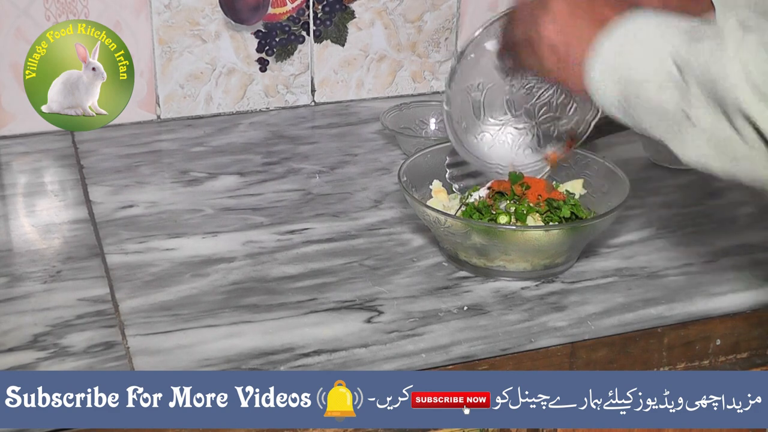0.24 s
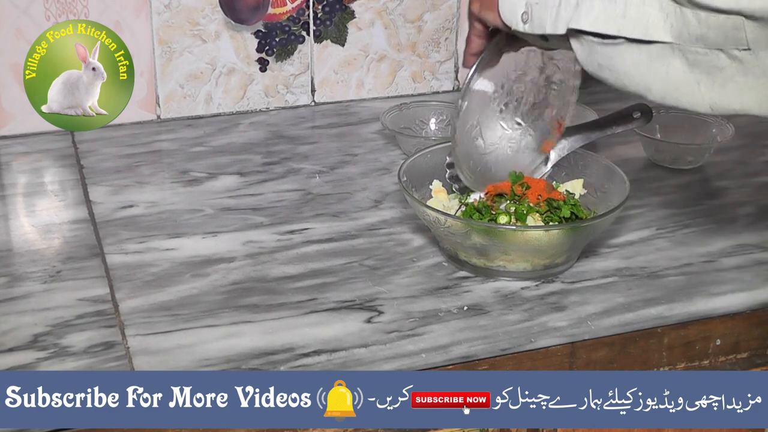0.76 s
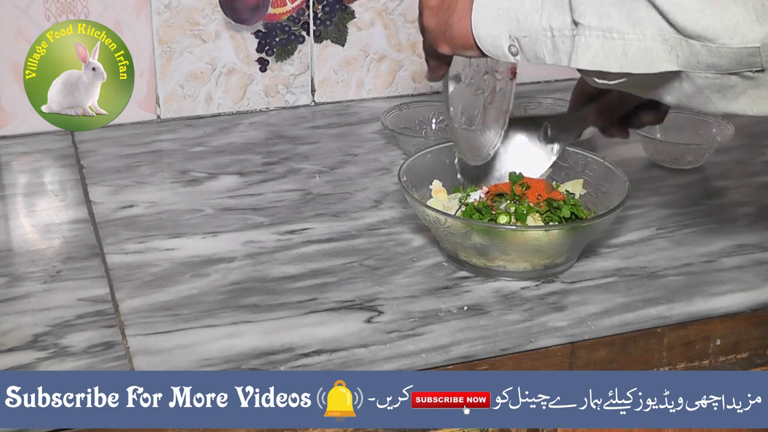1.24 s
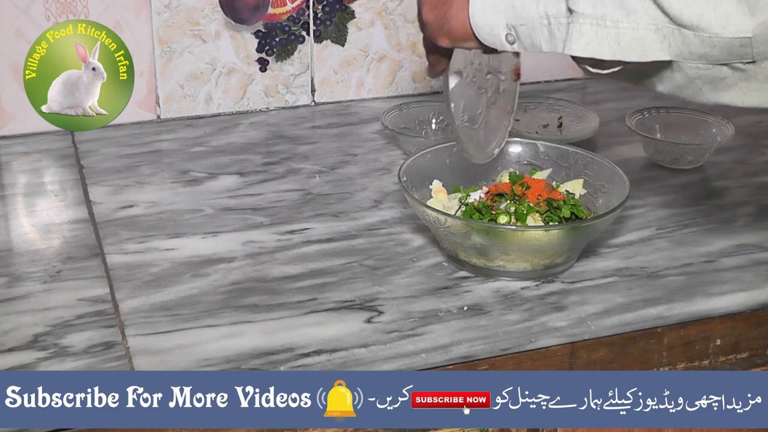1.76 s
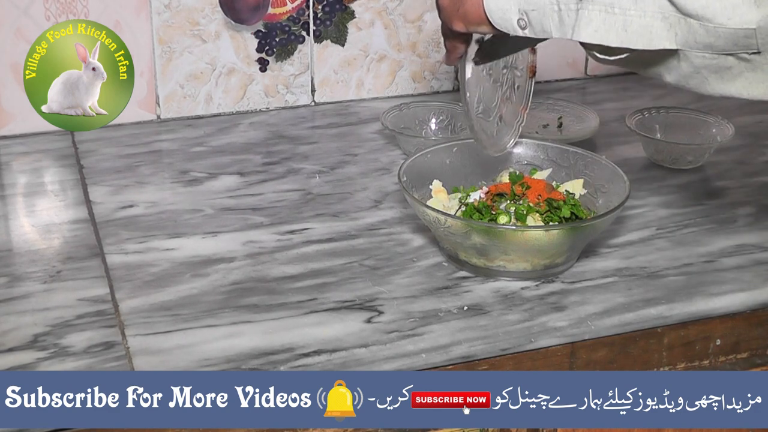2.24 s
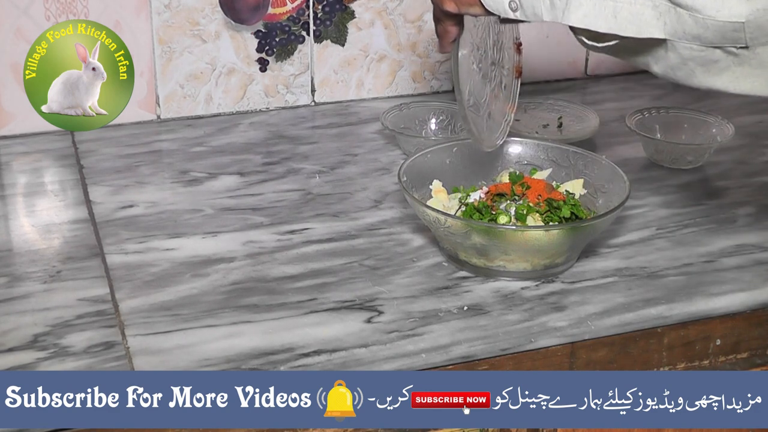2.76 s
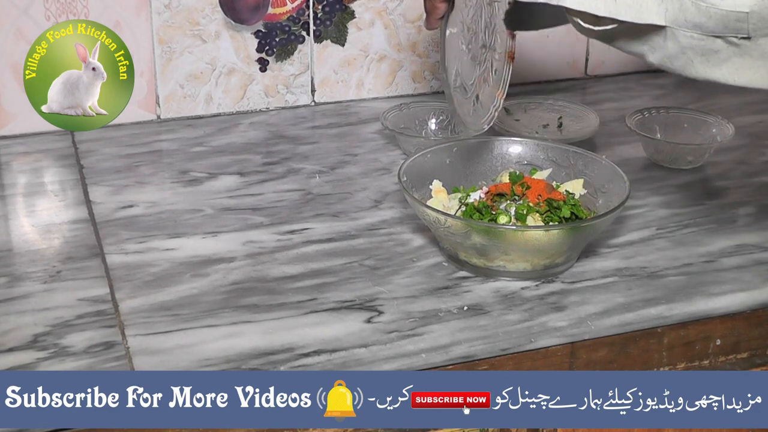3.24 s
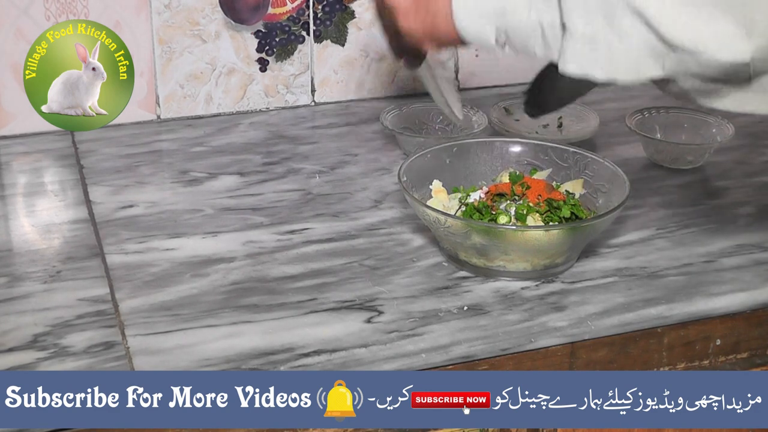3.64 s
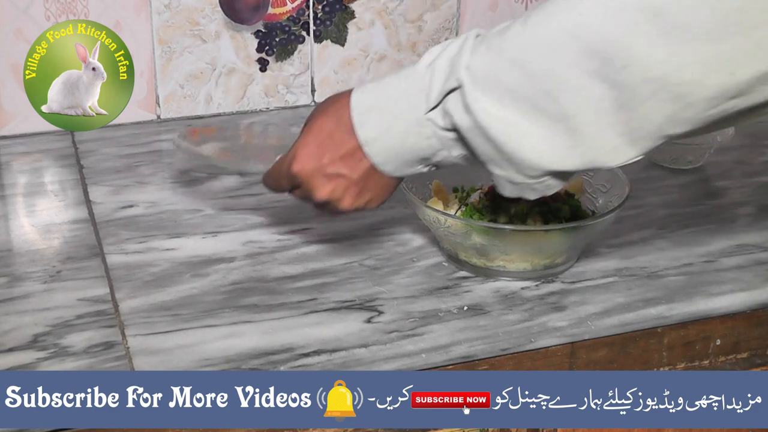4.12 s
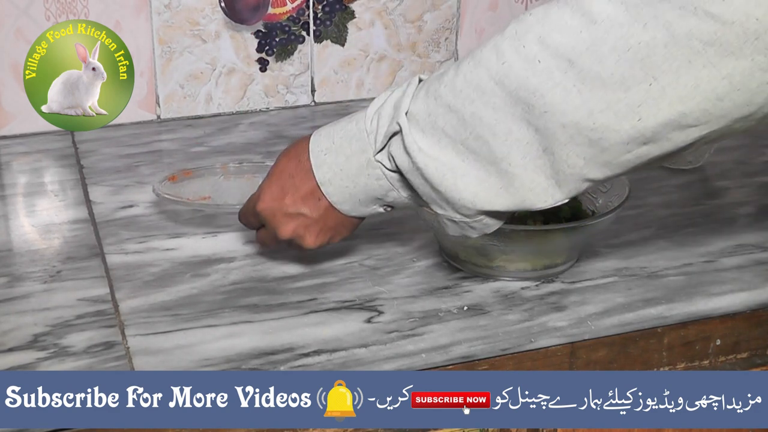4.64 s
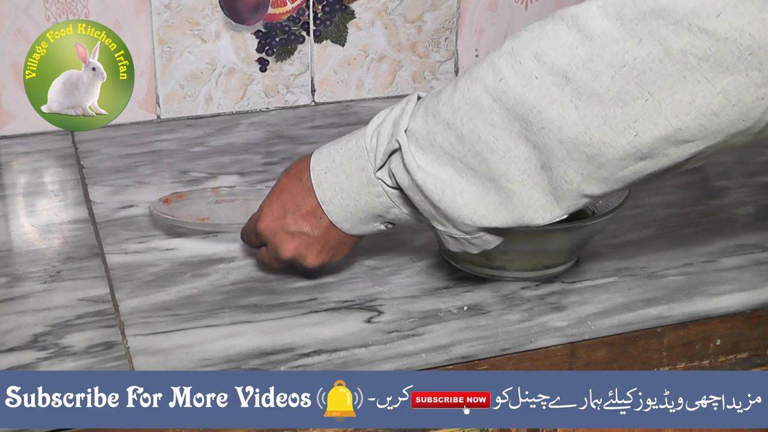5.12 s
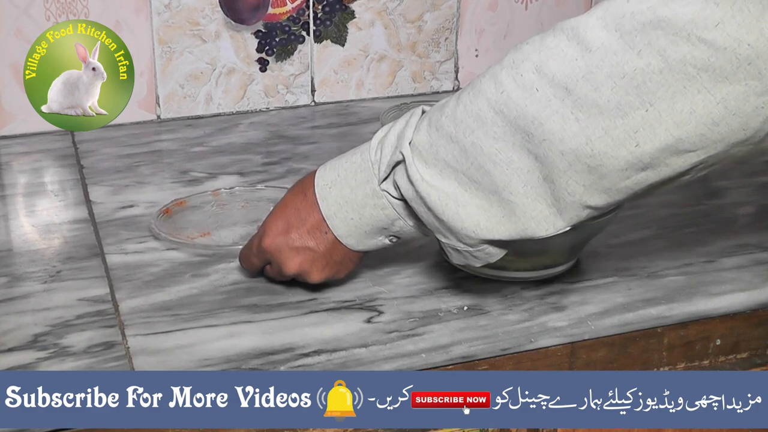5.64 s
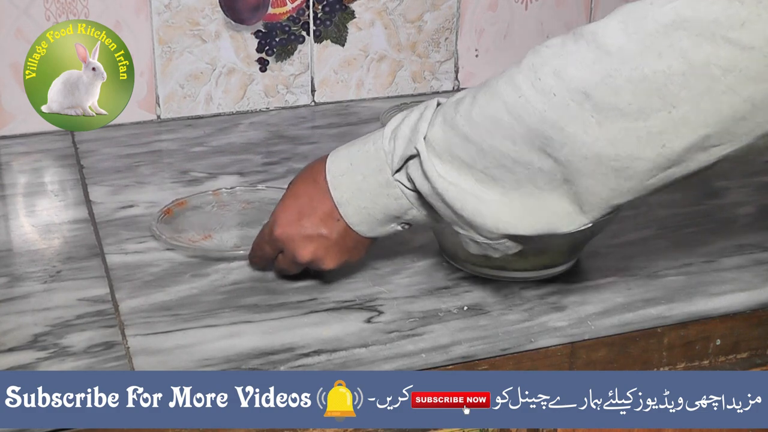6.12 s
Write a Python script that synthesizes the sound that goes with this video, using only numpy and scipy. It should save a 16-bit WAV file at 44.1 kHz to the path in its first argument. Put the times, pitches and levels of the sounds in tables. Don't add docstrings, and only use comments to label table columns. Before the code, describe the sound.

A quiet tiled kitchen with low, steady hum and faint sleeve rustle, heard close up with a short bright room echo. At about 1.2 s a steel blade lightly clinks a glass bowl's rim, then its side at 1.4 s with a quick flutter of touches. A low puff of air bumps the microphone around 1.6 s. Loud, sharp taps on a hand-held glass plate follow at 1.9 and 2.3 s, ringing briefly, then softer ones at 2.4 s with a chirping slide near 2.5 s. Another tap comes at 2.8 s, a bumpy, gritty scrape with a tiny squeak at 3.0-3.1 s, a soft nudge at 3.3 s and a last tap at 3.5 s. Cloth creaks quietly. At 5.24 s the plate clacks down on stone, bounces at 5.29 s and rattles, then rocks with short groans, ticks and drags, ending in a firmer scrape near 6.35 s.

```python
import sys
import numpy as np
from scipy import signal
from scipy.io import wavfile
from scipy.ndimage import uniform_filter1d

SR = 44100
rng = np.random.default_rng(int(sys.argv[2]) if len(sys.argv) > 2 else 0)


def wav_out(sig):
    wavfile.write(sys.argv[1], SR, np.round(np.clip(np.atleast_2d(sig).T, -1, 1) * 32767).astype(np.int16))


def gain_from_db(level_db):
    decades = np.asarray(level_db, float) / 20
    return 10 ** decades


N = 281358


def rms_one(x):
    return x / np.sqrt(np.mean(x ** 2) + 1e-20)


def at_hz(points, hz):
    point_hz, value = np.transpose(points)
    return np.interp(np.log(hz), np.log(point_hz), value)


def butter(x, order, hz, kind="low"):
    return signal.sosfilt(signal.butter(order, hz, kind, fs=SR, output="sos"), x)


def drift(rate_hz):
    r = np.exp(-80 * np.pi * rate_hz / SR)
    slow = signal.lfilter([1], [1, -2 * r, r * r], rng.standard_normal(N // 40 + 2002))[2000:]
    return np.interp(np.arange(N) / 40, np.arange(len(slow)), rms_one(slow))


def ring(clicks, hz, t60):
    r, w = gain_from_db(-60 / (t60 * SR)), 2 * np.pi * hz / SR
    return signal.lfilter([0, np.sin(w)], [1, -2 * r * np.cos(w), r * r], clicks + 1e-18)


def spin(hz, size):
    step = np.exp(2j * np.pi * hz / SR)
    return np.cumprod(np.repeat(step, size, axis=-1), axis=-1) / step


EDGES_HZ = 20 * 2 ** np.arange(0, 9.9, .4)


def bands(size):
    white = rng.standard_normal((2, size))
    for k, (low, high) in enumerate(zip(EDGES_HZ, EDGES_HZ[1:])):
        yield np.sqrt(low * high), butter(white[k % 2], 2, [low, high], "band")


def coloured(spectrum, patchy_db, size=N):
    shared = drift(8.0)[:size]
    total = np.zeros(size)
    for hz, x in bands(size):
        flicker_db = patchy_db * (shared + drift(15)[:size])
        total += x * gain_from_db(at_hz(spectrum, hz) + flicker_db)
    return rms_one(total)


def swells(rows, rise_db_s, fall_db_s):
    t = np.arange(N) / SR
    level_db = [db - rise_db_s * (s - t).clip(0) - fall_db_s * (t - s - length).clip(0)
                for s, length, db in rows]
    return gain_from_db(np.max(level_db, axis=0))


# frequency in Hz, level in dB per Hz.
CRACK = [(88, -51.5), (150, -9.5), (1170, -16.5), (1800, -3), (2570, -15), (3190, -5), (5760, -11.5),
         (6350, -29), (8050, -11.5), (9430, -23.5), (12400, -5), (15100, -23.5), (16700, -32)]
BURST = coloured(CRACK, patchy_db=0, size=SR)
SPREAD_DB, SPREAD_RAD = 1.0, .4
EDGE_CUT_HZ, FLAT_CUT_HZ = 11700, 7372
GLASS_CUT_HZ, STONE_CUT_HZ, FINGER_CUT_HZ = 20000, 2782, 1600


def struck(taps, modes, cut_hz, damping, crack_s=.006, split=.012):
    pair_share, pair_beat_hz = 0.48, 17
    linger_share, linger_slowing = 0.068, 0.19
    twin_share = 0.48
    out, span = np.zeros(N + SR), np.arange(SR // 4) / SR
    hz, level_db, t60 = np.transpose(modes)
    dying = gain_from_db(-60 * span / (damping * t60[:, None]))
    beat = spin(pair_beat_hz * np.sqrt(hz[:, None] / 1800), len(span))
    lingering = linger_share * (1 - pair_share + pair_share * beat) * dying ** linger_slowing
    rings = spin(hz[:, None], len(span)) * (dying + lingering)
    offset = split * rng.uniform(.3, 1, (3, len(hz), 1)) * [[[1]], [[-1]], [[2]]]
    near_hz = hz[:, None] * (1 + offset)
    phase = np.exp(2j * np.pi * rng.random(near_hz.shape))
    twins = (spin(near_hz, len(span)) * phase).sum(0) * dying
    soft = 1 / np.sqrt(1 + (hz / cut_hz) ** 2)
    crack_filter = signal.butter(2, min(cut_hz, 20000), fs=SR)
    crack_shape = np.exp(-span / crack_s) + 0.22 * np.exp(-span / 0.000049)
    for s, db, crack_db in taps:
        chance = rng.standard_normal((3, len(modes)))
        size = soft * gain_from_db(level_db + SPREAD_DB * chance[0]) / np.sqrt(np.sum(gain_from_db(level_db) ** 2))
        main = (size * np.exp(1j * SPREAD_RAD * chance[1])) @ rings
        crowd = twin_share * (size * np.exp(1j * chance[2])) @ twins
        body = 0.46 * (main + crowd).imag * np.minimum(span / 0.0013, 1)
        start = rng.integers(SR // 2)
        noise = signal.lfilter(*crack_filter, BURST[start:start + len(span)])
        crack = 0.39 * gain_from_db(crack_db) * noise * crack_shape
        out[round((s + .0006) * SR):][:len(span)] += gain_from_db(db) * (body + crack)
    return out[:N]


def friction(modes, per_s, t60, spread_db):
    when = rng.random(N) < per_s / SR
    size = gain_from_db(spread_db * np.minimum(rng.exponential(1, N), 4))
    slips = when * size * rng.choice([-1, 1], N)
    t = np.arange(SR // 5) / SR
    response = sum(gain_from_db(db - 60 * t / t60) * np.sin(2 * np.pi * hz * t) for hz, db, _ in modes)
    return rms_one(signal.oaconvolve(slips, response)[:N]), rms_one(slips)


# frequencies in Hz, then ring times (t60) in seconds.
PLATE_HZ = [335, 580, 995, 1150, 1270, 1545, 1640, 1817, 1876, 2330, 2850, 3175, 3700, 3880, 4055, 4525,
            4720, 4870, 5120, 5245, 5470, 5595, 5850, 6460, 7000, 7868, 8270, 10100, 10430, 12050]
PLATE_T60 = [.14, .1, .1, .08, .12, .09, .08, .42, .26, .1, .1, .36, .1, .12, .1, .1, .1, .1, .13, .17, .12,
             .13, .18, .07, .08, .07, .06, .1, .08, .09]


def plate(spot_db):
    return list(zip(PLATE_HZ, spot_db, PLATE_T60))


# frequency in Hz, level in dB per Hz.
HUM = [(13, -31), (22, -5), (93, 1.5), (175, -15), (230, 0.5), (387, -7), (431, -3), (668, -10.5),
       (877, -7.5), (1150, -13), (1640, -13), (3080, -23), (4270, -23.5), (12700, -36), (15000, -54.5)]
# frequency in Hz, rms level in dB.
HUM_LINES = [(43.1, -75), (112, -75), (436.0, -76), (877.5, -77)]


def room_hum():
    t = np.arange(N) / SR
    out = gain_from_db(-62) * coloured(HUM, patchy_db=.3)
    for hz, db in HUM_LINES:
        out += np.sqrt(2) * gain_from_db(db + 3.3 * drift(1.1)) * np.sin(2 * np.pi * hz * t)
    return out


# frequency in Hz, level in dB per Hz.
CLOTH = [(710, -35), (1200, 0), (1700, -1.5), (2260, 0), (2620, -3), (3450, 2), (5100, 2), (8660, -18),
         (12900, -7), (15000, -42.5)]
# frequency in Hz, level in dB, t60 in seconds.
WEAVE = [(4440, -6, 0.0034), (7150, -15, 0.0023), (3616, -11, 0.0022)]
# start in seconds, length in seconds, level in dB.
RUSTLE = [
    (.45, 0.33, -65.5),
    (2.04, .01, -49),
    (2.47, 0.0068, -31),
    (2.98, 0.046, -44.5),
    (3.5, 0.16, -42.5),
    (4.95, 0.46, -59.5),
    (5.4, 0.069, -51),
    (5.9, 0.73, -54),
]
# start in seconds, length in seconds, level in dB.
SLEEVE = [
    (4.37, 0.011, -70),
    (4.45, 0.0096, -74),
    (4.77, 0.043, -65.5),
    (5.17, 0.26, -64.5),
    (5.72, 0.03264, -63.5),
]


def sleeves():
    cloth = coloured(CLOTH, patchy_db=.9)
    for hz, db, t60 in WEAVE:
        fold = rms_one(ring(rng.standard_normal(N), hz, t60))
        cloth = cloth + gain_from_db(db + 2.1 * drift(2.7)) * fold
    bright = rms_one(np.diff(cloth[::-1], prepend=0))
    rubbing = gain_from_db(-63.5) + swells(RUSTLE, rise_db_s=149.5, fall_db_s=161)
    return rubbing * gain_from_db(-14) * cloth + swells(SLEEVE, rise_db_s=288, fall_db_s=78.5) * bright


# start in seconds, length in seconds, level in dB.
PUFF = [
    (1.565, 0.04, -28.5),
    (1.75, 0.02083, -41.5),
    (1.86, 0.064, -36.5),
    (2.07, 0.0145, -47.5),
]


def air_puff():
    low = butter(rng.standard_normal(N), 3, [24, 95], "band")
    return swells(PUFF, rise_db_s=490, fall_db_s=248) * gain_from_db(-9.5) * rms_one(low)


# time in seconds, level in dB.
THUDS = [
    (5.239, -51.5),
    (5.293, -60),
    (5.602, -61),
    (5.72, -83),
    (6.03, -66),
]


def counter_thud():
    clicks = np.zeros(N)
    for s, db in THUDS:
        clicks[round(s * SR)] = gain_from_db(db)
    return ring(clicks, hz=84, t60=0.13) + ring(clicks, hz=118.57, t60=0.941)


# frequency in Hz, level in dB, t60 in seconds.
BOWL_RIM = [(332, -13, 0.14), (902.01, -8, 0.085), (1065, -2.5, 0.044), (1822, -6, 0.064),
            (2090, -4.5, 0.14), (2870, -0.5, 0.1), (3010, -11, 0.042), (3812, -7, 0.049),
            (3920.7, -5.5, 0.085), (4720, 4.5, 0.032), (4830, 0, 0.038), (4830, -7.5, 0.11),
            (5782.2, -4, 0.036), (5850, -7, 0.025), (6100, -0.5, 0.0275), (6800, -20, 0.04),
            (6900, -7, 0.03), (7450, -7, 0.02767), (9240, -17, 0.0679), (11264, -31, .05)]
# time in seconds, peak in dB, crack in dB re ring.
RIM_TAPS = [
    (1.2160, -42, -14),
    (1.2295, -21.5, -4.5),
    (1.2345, -22, -10),
]
# frequency in Hz, level in dB, t60 in seconds.
BOWL_SIDE = [(332, -8, 0.14), (689, -3.5, 0.05), (1024.1, -4.5, 0.11), (1286, -7, 0.12), (1578, -9, 0.064),
             (1942, -2.5, 0.091), (2540, -6, 0.049), (2950, -9, 0.098), (3590, -16.5, 0.13),
             (5332.3, -11.5, 0.091), (4967, -10, 0.075), (5274, -10, 0.095), (5910, -13, 0.12),
             (6504.4, -11.5, 0.06), (7190, -11.5, 0.045), (7835.3, -15, .05), (8690, -12, 0.047),
             (10000, -15, 0.04)]
# time in seconds, peak in dB, crack in dB re ring.
SIDE_TAPS = [
    (1.395, -24, -5.5),
    (1.4, -21, -8.5),
    (1.406, -20, -8.5),
    (1.417, -26, -10),
    (1.429, -34, -17),
]


def bowl_taps():
    return (struck(RIM_TAPS, BOWL_RIM, EDGE_CUT_HZ, damping=0.76)
            + struck(SIDE_TAPS, BOWL_SIDE, FLAT_CUT_HZ, damping=0.49))


AT_FOOT = [-7, -14, -2.5, -1, 3, -2, 1.5, -3.5, -12, -5.5, -46.5, -11, -9.5, -8.5, -7.5, -16, -39, -42,
           -34.5, -4, -20, -7.5, -49, -54, -56, -19.5, -56, -67, -56, -64]
# time in seconds, peak in dB, crack in dB re ring.
LANDING = [
    (5.2395, -5, -6),
    (5.2913, -16, 3),
]


def plate_landing():
    chatter = [(s + k * 0.011, -22, -15) for s, _, _ in LANDING for k in (1, 2, 3)]
    return struck(LANDING + chatter, plate(AT_FOOT), STONE_CUT_HZ, damping=0.45, crack_s=0.0028)


# frequency in Hz, level in dB, t60 in seconds.
RIM_RATTLE = [(8622, 1, 0.05), (7232, 0, 0.064), (5800, -2, 0.0406), (10350, 1, 0.03877)]
# time in seconds, peak in dB.
RATTLE = [
    (5.337, -46),
    (5.3464, -49),
    (5.414, -42.5),
    (5.403, -52),
    (5.4698, -54),
    (6.309, -48),
]


def rim_rattle():
    taps = [(s, db, -0.5) for s, db in RATTLE]
    return struck(taps, RIM_RATTLE, GLASS_CUT_HZ, damping=0.5415, crack_s=0.0043)


# frequency in Hz, level in dB, t60 in seconds.
PLATE_ROCKING = [(348, -14.5, 0.16), (616, -13.5, 0.22), (653.08, -13, 0.15), (1020, -15.5, 0.11),
                 (1266, 0, 0.29), (1272, -8, 0.34), (1323, -3.5, 0.12), (1791.2, -14.5, 0.29),
                 (2350, -19, 0.28), (3186, -20, .3), (3920, -25, .3), (5310, -33, 0.35), (5620, -39, .3)]
# time in seconds, peak in dB, length in seconds.
ROCKING = [(5.559, -43, 0.021), (5.568, -25.5, 0.015), (5.596, -21.5, .015), (5.622, -27, 0.0087),
           (5.628, -24.5, 0.013), (5.643, -39.5, .02), (5.684, -44, .018), (5.7087, -26, .02),
           (5.73, -24, .013), (5.802, -35, 0.010826), (5.818, -40, 0.019), (5.869, -37, .016),
           (5.924, -34, .013), (5.956, -39, 0.013), (6.031, -39.5, 0.014), (5.972, -41.5, 0.018),
           (6.233, -37.5, 0.012), (5.998, -40.5, 0.013), (5.782, -41, 0.018), (6.326, -25.5, 0.012),
           (6.341, -26.5, .013), (6.359, -23.5, .013)]


def rocking():
    out = np.zeros(N + SR)
    hz, level_db, _ = (column[:, None] for column in np.transpose(PLATE_ROCKING))
    for s, db, length in ROCKING:
        chance, start = rng.standard_normal((2, len(hz), 1)), rng.integers(SR // 2)
        span = np.arange(int(length * SR)) / SR
        phase = 2 * np.pi * hz * (span - length / 2) + SPREAD_RAD * chance[1]
        tones = (gain_from_db(level_db + SPREAD_DB * chance[0]) * np.sin(phase)).sum(0)
        swell = np.sin(np.pi * (span / length) ** 0.87) ** 2
        grit = signal.lfilter(*signal.butter(2, 4500, fs=SR), BURST[start:start + len(span)])
        click = gain_from_db(-21) * grit * np.exp(-span / 0.0019)
        out[round((s - .002) * SR):][:len(span)] += gain_from_db(db) * (0.3 * tones * swell + click)
    return out[:N]


# frequency in Hz, level in dB, t60 in seconds.
FOOT = [(607.9, -1, 0.2), (993.18, -8.5, 0.4), (1290, 0, 0.0021), (1810, -2, 0.07), (2344.5, -10, .08),
        (5290, -18, .1)]
# time in seconds, peak in dB, crack in dB re ring.
FOOT_TICKS = [(5.545, -43, -25), (5.733, -36, -18.5), (5.752, -43, -20), (5.803, -34.5, -13.5),
              (5.87, -42, -12), (5.925, -40, -15), (6.031, -46, -12), (6.139, -49, -6), (6.236, -44.5, -3),
              (6.268, -48, -14.5), (6.31, -42, -15), (6.372, -28, -10)]


def foot_ticks():
    return struck(FOOT_TICKS, FOOT, FLAT_CUT_HZ, damping=0.9, crack_s=0.003)


# start in seconds, length in seconds, level in dB.
DRAG = [
    (5.64, 0.021, -45),
    (5.74, 0.094, -48),
    (5.9, 0.09, -48.5),
    (6.32, 0.0771, -42.5),
]


def plate_drag():
    rings, _ = friction(PLATE_ROCKING, per_s=550, t60=0.081, spread_db=2.5)
    late = np.clip((np.arange(N) / SR - 6.2) / 0.18, 0, 1)
    upper_modes = [(3252, 4.5, 0), (3870, 4.5, 0), (5270, 2.5, 0),
                   (5610, 2.0, 0), (2335, 5.0, 0), (7960, -12, 0)]
    upper, _ = friction(upper_modes, per_s=450, t60=0.0681, spread_db=0.0)
    return swells(DRAG, rise_db_s=142, fall_db_s=166.5) * gain_from_db(-2.0) * (rings + 0.64 * late * upper)


# frequency in Hz, level in dB, t60 in seconds.
PLATE_NUDGED = [(249, 1, 0.07), (329, 1.5, 0.21), (535.2, 21.5, 0.018), (697, -9, 0.11),
                (1799.8, 1, 0.1857)]
# time in seconds, peak in dB, crack in dB re ring.
NUDGE = [
    (3.312, -23, -14),
]


def finger_nudge():
    return struck(NUDGE, PLATE_NUDGED, FINGER_CUT_HZ, damping=0.58)


# frequency in Hz, level in dB, t60 in seconds.
FREE_RIM = [(3130, -3, 0.3176), (5217, -4, 0.1506), (5700, -5, .1)]
# time in seconds, peak in dB, crack in dB re ring.
SLIP_OFF = [
    (3.53, -40, -25),
    (3.547, -38.5, -25),
]


def blade_slip_off():
    return struck(SLIP_OFF, FREE_RIM, EDGE_CUT_HZ, damping=0.9146)


# frequency in Hz, level in dB, t60 in seconds.
KNOCK = [(1227.2, -8, 0.03), (1563.5, -8, 0.04), (1708, -2, 0.06), (1793, 0, 0.0654), (1953, -2, 0.064),
         (2030, -8, 0.01)]
# time in seconds, peak in dB, crack in dB re ring.
KNOCK_TAPS = [(1.8785, -15, -12), (2.2995, -9, -2.5), (2.444, -19.5, -15.5), (3.019, -28, -15),
              (3.042, -26, -20), (3.052, -26, -15), (3.061, -28.5, -15), (3.067, -20, -15),
              (3.081, -23.5, -12.5), (3.091, -28, -12), (3.499, -22, -8), (5.2396, -10, -34.5)]


def grip_knock():
    return struck(KNOCK_TAPS, KNOCK, EDGE_CUT_HZ, damping=0.69, crack_s=0.002)


# frequency in Hz, level in dB, t60 in seconds.
BLADE = [(14620, 2.5, .045), (14300, -8, .03), (12833, -9, .04)]
# time in seconds, peak in dB.
BLADE_TAPS = [
    (1.879, -32),
    (2.299, -23),
    (2.305, -32),
    (2.827, -42),
]


def blade_ring():
    taps = [(s, db, -30) for s, db in BLADE_TAPS]
    return struck(taps, BLADE, GLASS_CUT_HZ, damping=0.9)


# time in seconds, peak in dB.
SQUEAK = [
    (3.086, -55),
    (3.092, -39),
    (3.1, -44.5),
]


def blade_squeak():
    taps = [(s, db, -30) for s, db in SQUEAK]
    return struck(taps, [(7040, 0, 0.083)], EDGE_CUT_HZ, damping=0.85, split=.001)


AT_BURR = [-24.5, -42, -33, -37, -25.5, -20, -24.5, -19, -26.5, -36, -28, -2, -19, -13, -1.5, -24, -26,
           -10.5, -5.5, 9, -22, 1, 2.5, -36, -9, 0, -7, -15, -3.5, -3]
# time in seconds, peak in dB.
CHIRPS = [
    (2.486, -27.5),
    (2.494, -26),
    (2.504, -23),
    (2.5062, -32.5),
    (2.8437, -33),
    (2.937, -38),
    (2.954, -39),
]


def blade_chirps():
    taps = [(s, db, -8.5) for s, db in CHIRPS]
    return struck(taps, plate(AT_BURR), EDGE_CUT_HZ, damping=0.46, crack_s=0.0033)


AT_PATTERN = [-13.5, -6, -14.5, -17, -0.5, -4, 1.5, -5.5, -37, -8, -11, -16, -20, -3, -26, -4.5, -9, -7, -6,
              -8, -17, -10, -8.5, -38, -25, -14.5, -31, -31, -27.5, -31]
# time in seconds, peak in dB, crack in dB re ring.
SCRAPE_TAPS = [
    (3.001, -27, -10),
    (3.018, -15, -15),
    (3.042, -14, -10.5),
    (3.058, -29, -4.5),
    (3.066, -17.5, -15),
    (3.082, -22, -9.5),
    (3.093, -29.5, -6),
]
# start in seconds, length in seconds, level in dB.
SLIDES = [
    (2.447, 0.041, -33),
    (3.02, 0.003326, -40),
    (3.043, 0.0399, -44.5),
]


def blade_scrape():
    ridges = struck(SCRAPE_TAPS, plate(AT_PATTERN), FLAT_CUT_HZ, damping=0.21, crack_s=0.0076)
    rings, slips = friction(plate(AT_PATTERN), per_s=500, t60=0.024, spread_db=1.5)
    grit = butter(slips, 2, [2000, 9000], "band")
    gain = swells(SLIDES, rise_db_s=2500, fall_db_s=700) * gain_from_db(-19.5)
    return ridges + gain * (rings + 2.8 * grit)


AT_TOP = [-20.5, -23.5, -22.5, -28, -28.5, -31, -33.5, -8, 2, -33.5, -16.5, -14, -19.5, -15, -11, -15.5,
          -6.5, -18.5, -11, -15.5, -12, -6, -8.5, -25.5, -23, -27, -27, -14.5, -24, -14]
AT_EDGE = [-15, -13, -15.5, -9, -17.5, -18, -12, -13, -1, -17, -20, -11, -11, -15, -5, -4, 2, 5.5, -18.5,
           -1, -3.5, -5, -3.5, -26, -22, -3, -21.5, -21.5, -21.5, -4]
AT_FACE = [-23, -9, -28, -26, -1, -0.5, 3, -11, -39, -8, -29, -3.5, -22.5, -8, 4, -17, -17, -16, -6.5, -4.5,
           -10, -16, -8, -23, -38, -23, -14, -38, -38, -33]
AT_MIDDLE = [-17, -17, -14.5, -13.5, -30, -25, -32, -6.5, -25.5, -25.5, -15, -10.5, -11.5, -16, -27, -7.5,
             -20, -30.5, -14.5, -24.5, -6.5, -18, -11.5, -8.5, -17, -31.5, -8, -28, -24, -36]
AT_LOW = [-19, -13.5, -20, -20, -15, -6.5, -35, -3.5, -40, -28, -34, -27, -32, -26, -9, -11, -29, -1, -12,
          -16, -23, -6, -12, -35, -7.5, -28, -13, -21, -19, -15]
# time in seconds, peak in dB, crack in dB re ring.
TOP_TAPS = [
    (1.879, -1.5, -10.5),
    (1.883, -11.5, -11.5),
    (1.901, -37, -6.5),
    (2.0, -35, -24),
]
EDGE_TAPS = [
    (2.299, -0.5, -9),
    (2.311, -16, -29.5),
]
FACE_TAPS = [
    (2.408, -20, -9),
    (2.444, -7, -14),
    (2.469, -50, -13),
]
MIDDLE_TAPS = [
    (2.827, -11, -6.5),
    (2.8343, -21, -3),
]
LOW_TAPS = [
    (3.487, -9, -11),
    (3.502, -17.5, -1),
]


def plate_taps():
    return (struck(TOP_TAPS, plate(AT_TOP), EDGE_CUT_HZ, damping=0.26)
            + struck(EDGE_TAPS, plate(AT_EDGE), EDGE_CUT_HZ, damping=0.36)
            + struck(FACE_TAPS, plate(AT_FACE), FLAT_CUT_HZ, damping=0.21)
            + struck(MIDDLE_TAPS, plate(AT_MIDDLE), EDGE_CUT_HZ, damping=0.41)
            + struck(LOW_TAPS, plate(AT_LOW), FLAT_CUT_HZ, damping=0.26))


# frequency in Hz, t60 in seconds.
ROOM_T60 = [(200, 0.7), (1000, 0.46), (4000, 0.38), (8000, 0.34), (13000, 0.23)]


def kitchen(x):
    t = np.arange(SR) / SR
    tail = sum(noise * gain_from_db(-60 * t / at_hz(ROOM_T60, hz)) for hz, noise in bands(SR))
    tail = tail * np.clip((t - .003) / 0.0018, 0, 1)
    return signal.fftconvolve(x, tail / np.sqrt(np.sum(tail ** 2)))[:N]


def microphone(x):
    x = butter(x, 2, 150, "high")
    x = signal.lfilter(*signal.iirnotch(183.2, 2.5, fs=SR), x)
    return butter(x, 5, 6467) + gain_from_db(2) * butter(x, 5, 6467, "high")


def scene():
    glass = bowl_taps() + plate_taps() + blade_scrape() + blade_chirps() + finger_nudge()
    glass = glass + plate_landing() + rim_rattle()
    contacts = glass + rocking() + plate_drag()
    close = grip_knock() + blade_slip_off() + foot_ticks()
    mid = microphone(contacts + gain_from_db(-10) * kitchen(contacts) + close)
    mid = mid + room_hum() + sleeves() + air_puff() + counter_thud() + blade_squeak() + blade_ring()
    side = gain_from_db(-34) * np.diff(mid, prepend=0)
    side += gain_from_db(-90) * rms_one(ring(rng.standard_normal(N), hz=150, t60=.06))
    return np.array([mid + side, mid - side])


def band_limit(x):
    return signal.sosfilt(signal.butter(12, 16850, fs=SR, output="sos"), x)


TOP_HZ = [13650, 14450, 15250]
TOP_GATE_DB = [-67, -60, -55.5]


def record(dry):
    x = signal.sosfilt(signal.cheby2(14, 60, 17200, fs=SR, output="sos"), dry)
    for hz, gate_db in zip(TOP_HZ, TOP_GATE_DB):
        lowpass = signal.ellip(8, .1, 45, hz, fs=SR, output="sos")
        top = x - signal.sosfiltfilt(lowpass, x)
        level_db = 10 * np.log10(uniform_filter1d(top ** 2, size=900).clip(1e-14))
        x = x - top * (1 - np.clip((level_db - gate_db) / 3.0, 0, 1))
    return band_limit(x)


dry = scene()
out = record(dry)
wav_out(out)
```